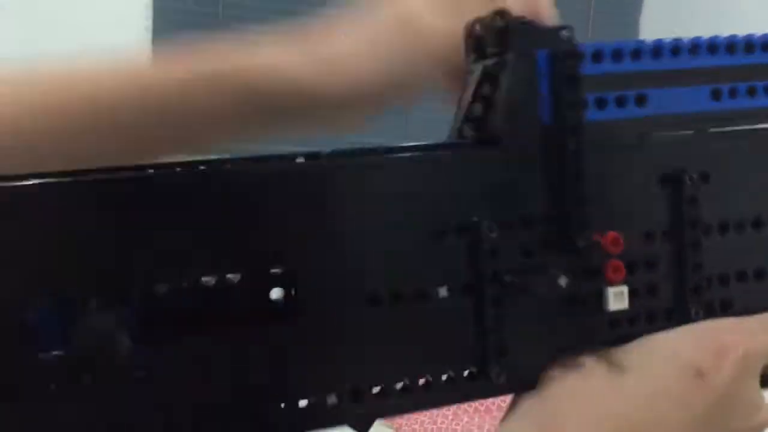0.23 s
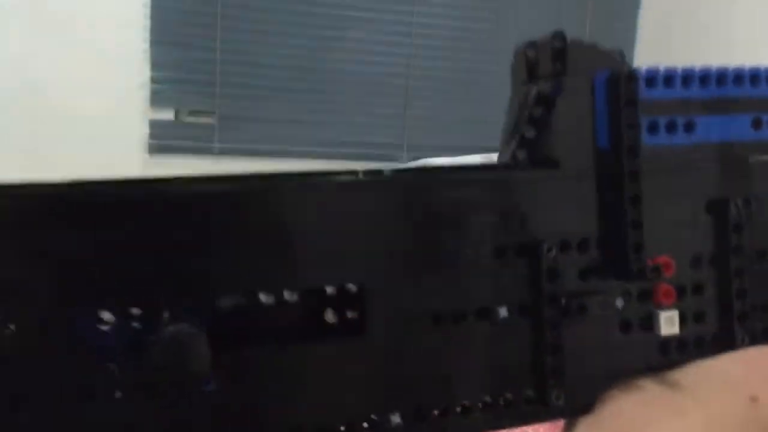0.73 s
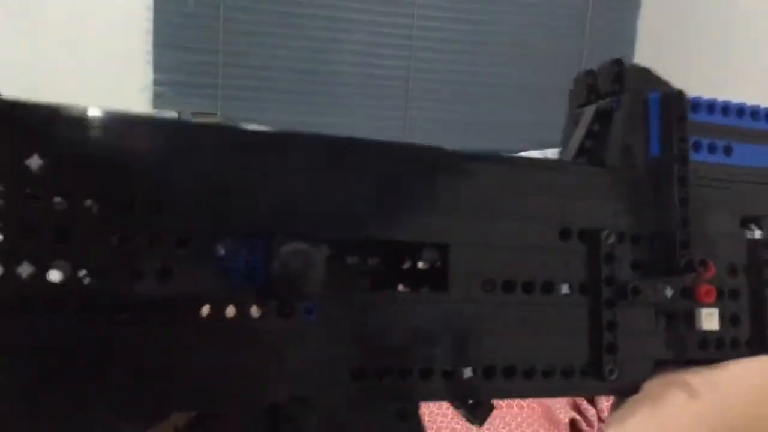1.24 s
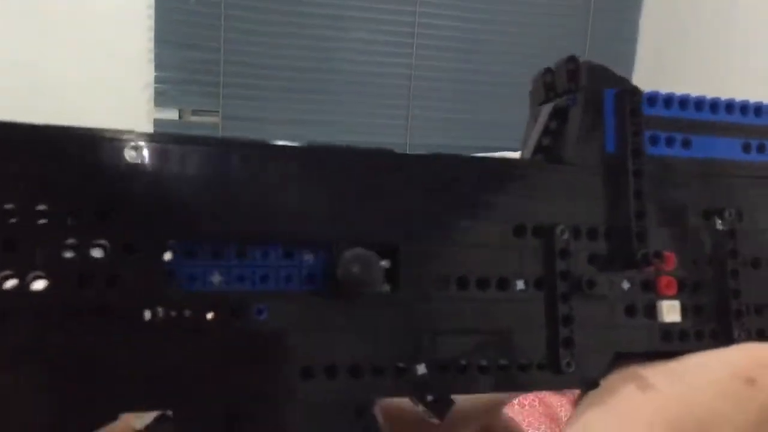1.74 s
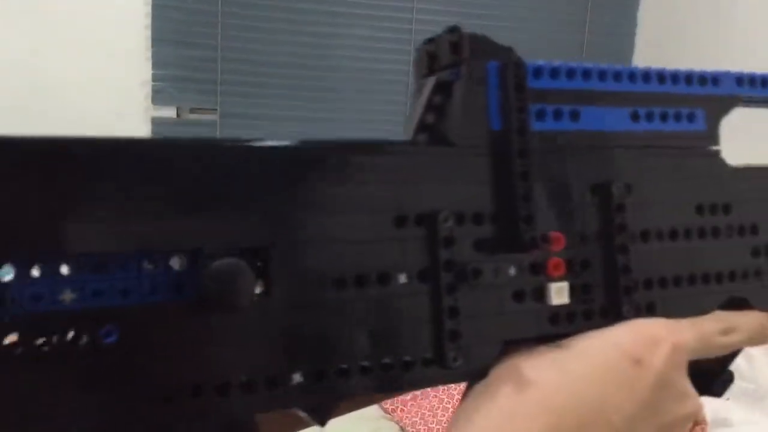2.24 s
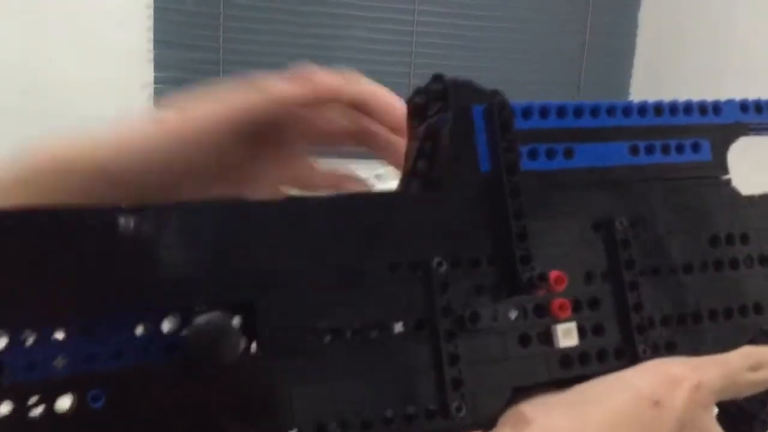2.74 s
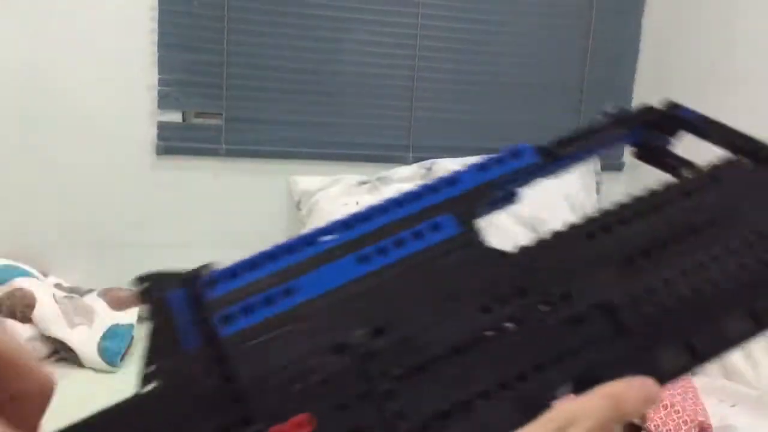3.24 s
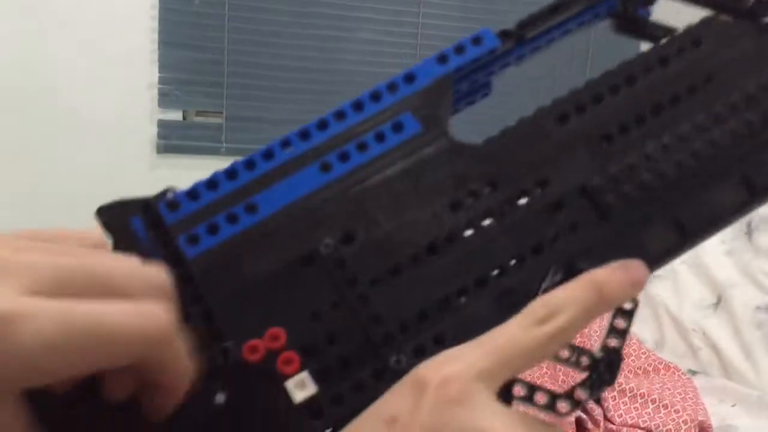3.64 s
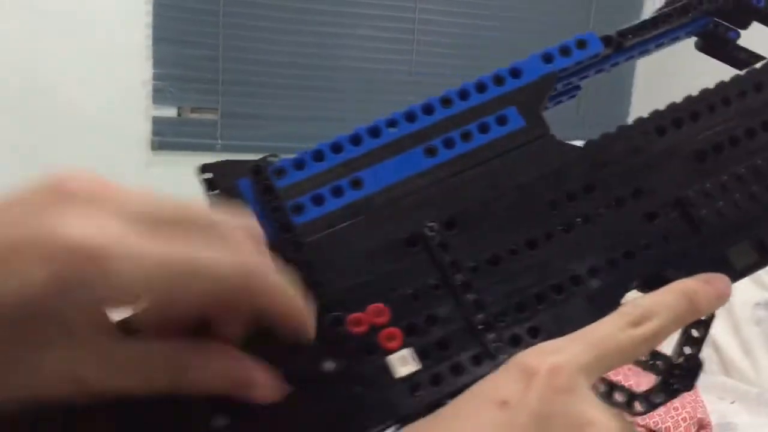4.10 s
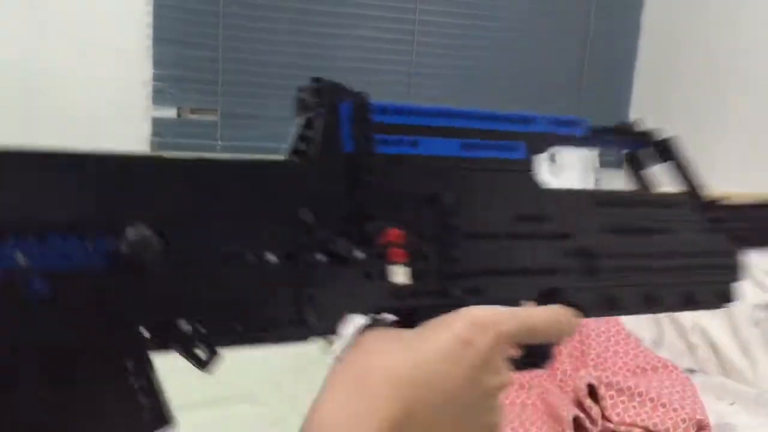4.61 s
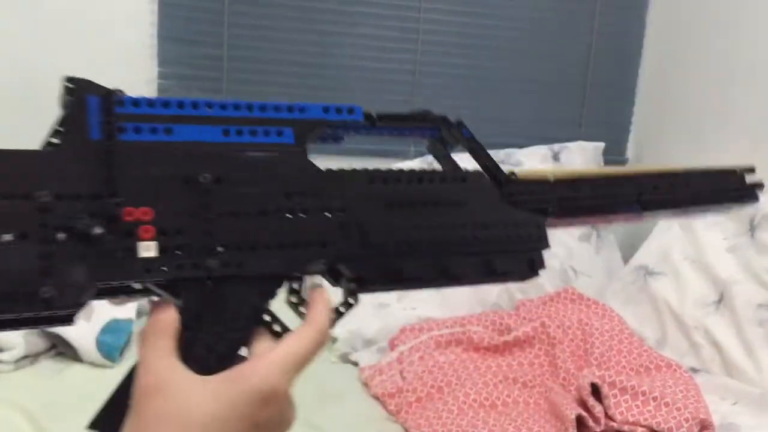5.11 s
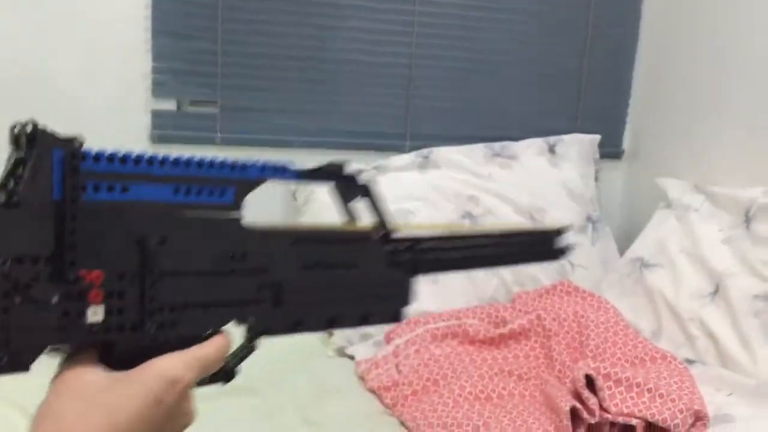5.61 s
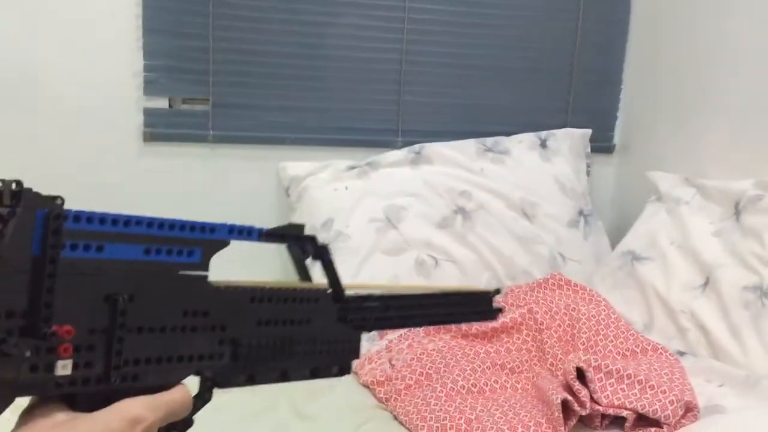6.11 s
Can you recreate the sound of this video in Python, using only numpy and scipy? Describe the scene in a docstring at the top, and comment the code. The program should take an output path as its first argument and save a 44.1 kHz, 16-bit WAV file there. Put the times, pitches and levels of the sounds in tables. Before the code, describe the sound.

Hard plastic clacks of a toy brick rifle being cocked and fired, one overloading the close microphone, over a soft fan hum indoors.

```python
"""A toy rifle of plastic bricks is cocked, fired and handled close to a phone in a small bedroom.
From the start, a fan hums over soft air noise; parts clack as noise bursts ringing the modes of the hollow frame.
Past one second the hardest blows fall: one jolts the microphone into overload and the gain control ducks.
The bolt then chatters along its slide; later come more clacks, a second hard group, and sparse faint clacks.
Throughout, fingers rub and squeak on the bricks as filtered noise, and the room answers with decaying noise."""
import sys
import numpy as np
from scipy import signal
from scipy.fft import rfft, irfft
from scipy.io import wavfile
from scipy.ndimage import uniform_filter1d

SR = 44100
rng = np.random.default_rng(int(sys.argv[2]) if len(sys.argv) > 2 else 0)


def file_out(sig):
    """Save sig as 16-bit WAV at sys.argv[1]."""
    # one column per channel
    cols = np.atleast_2d(sig).T
    # limit, then scale
    lim = np.clip(cols, -1, 1)
    pcm = np.round(lim * 32767).astype(np.int16)
    wavfile.write(sys.argv[1], SR, pcm)


N = 280035

# Plastic parts striking one another.
# Each row: start in seconds, level of the loudest 2 ms in dB, treble snap against body in dB,
# snap pitch in Hz, decay time of the rattle in ms.
PART_STRIKES = [(0.13, -57, -2, 11800, 3.1), (0.515, -38, -9.5, 4500, 7.5), (0.529, -31.5, -5, 11000, 6.3),
                (0.536, -28.5, -22, 4500, 8), (0.733, -44, -16, 4500, 7.4), (0.749, -38.5, -16, 6200, 3.3),
                (0.845, -38.5, -19.5, 4500, 8.1), (0.896, -48, -24, 4500, 7.1),
                (0.923, -49, -7.5, 4400, 3.3), (1.223, -28, -10, 4500, 2.5), (1.229, -33, -11, 6200, 9.3),
                (1.2502, -7, -0.4, 11400, 1.2), (1.2524, -10, 2.1, 11400, 1.5), (1.2597, -8, 7, 14000, 1.4),
                (1.2635, -11, -2.5, 6500, 1.4), (1.5832, -25, -16, 4500, 5.8),
                (2.055, -26.5, -15, 12100, 4.8), (2.285, -40, -14, 4400, 5.4), (2.297, -37, -11, 4500, 4.7),
                (2.324, -27, -8, 5300, 4.4), (2.332, -28, -16, 4900, 4.3), (3.074, -54.5, -7, 9300, 2.5),
                (3.274, -50, -9, 5300, 2.6), (3.288, -33, -4, 8600, 1.5), (3.295, -35, -14, 5600, 2.5),
                (3.523, -52, 1.5, 11200, 5), (3.587, -65, 6, 14000, 2.5), (3.635, -47, -3, 6900, 6),
                (3.687, -50, -5, 12000, 3.6), (3.702, -52, -3, 7100, 2.2), (3.742, -46, -2.1, 8500, 5.2),
                (3.753, -42, -3, 12200, 4.5), (3.772, -49, 0.1, 7700, 3.1), (3.845, -54, -9, 4500, 2.5),
                (3.855, -56, -3, 9000, 2.5), (4.012, -34, -9, 4500, 3), (4.0193, -17.5, -1.5, 11500, 2.7),
                (4.0285, -17, -14, 5500, 1.1), (4.0325, -12.5, 4, 9500, 2.1), (4.036, -15, -13, 4400, 3.6),
                (4.189, -51, 1.1, 10000, 2.8), (4.203, -53, -1.5, 9000, 2.5), (4.266, -60, -1.5, 6000, 2.5),
                (4.353, -55, -4, 6000, 2.3), (4.483, -43.5, -3.5, 6000, 1.9),
                (4.805, -63.5, 6.5, 8100, 2.5), (5.047, -50.5, -13.5, 5800, 2.5)]
# Harder blows favour higher modes: pitch of a 0 dB blow, and its slope.
PITCH_HZ, PITCH_OCTAVES_PER_DB = 2750, .013


def clacks():
    """Impact excitation: each clack is a flurry of tiny contacts that swells fast, dies and rings the frame."""
    length = 4096
    out, t = np.zeros(N + length), np.arange(length) / SR
    blows = PART_STRIKES + bolt_chatter()
    contacts = rng.standard_normal((len(blows), length))
    # Grip and place shift the strength (dB) and tuning of the modes a little.
    strengths_db = rng.normal(0, 2.5, (len(blows), len(FRAME_MODES)))
    detunes = np.exp(rng.normal(0, .05, len(blows)))
    for blow, noise, own_db, detune in zip(blows, contacts, strengths_db, detunes):
        start, db, snap_db, snap_hz, decay_ms = blow
        flurry = np.minimum(t / 0.0014, 1) * np.exp(-t * 1000 / decay_ms)
        uneven = noise * np.sqrt(np.abs(noise))   # a few contacts stand out
        push = uneven * flurry + 1e-18
        pitch_hz = PITCH_HZ * 2 ** (PITCH_OCTAVES_PER_DB * db)
        body, snap = plastic(push, pitch_hz, snap_hz, own_db, detune)
        hit = body / loudest(body) + from_db(snap_db) * snap / loudest(snap)
        out[round(start * SR):][:length] += from_db(db) * hit / loudest(hit)
    return out[:N]


# The bolt's contacts: start and loudest time, peak level, swell and fade in dB per second.
SLIDE_S, SLIDE_LOUDEST_S, SLIDE_DB = 1.5945, 1.634, -16.5
SLIDE_SWELL_DB_PER_S, SLIDE_FADE_DB_PER_S = 142, 600
# First mean gap and the ratio of each gap to the last; then the snap, rattle decay and number of contacts.
SLIDE_GAP_S, SLIDE_GAP_RATIO = .0105, .9
SLIDE_SNAP_DB, SLIDE_MS, SLIDE_CONTACTS = -5, 5, 9
SNAP_LOW_HZ, SNAP_HIGH_HZ = 4430, 10500   # range of the snap pitch


def bolt_chatter():
    """Repeated impact: contacts on the slide tend to come faster, swelling then dying, as rows like the strikes."""
    draws = rng.standard_normal((SLIDE_CONTACTS, 3))
    snap_hz = SNAP_LOW_HZ * (SNAP_HIGH_HZ / SNAP_LOW_HZ) ** rng.random(SLIDE_CONTACTS)
    mean_gaps = SLIDE_GAP_S * SLIDE_GAP_RATIO ** np.arange(SLIDE_CONTACTS)
    gaps = mean_gaps * np.exp(.12 * draws[:, 0])
    start = SLIDE_S + np.cumsum(gaps) - gaps[0]
    swell_db = SLIDE_SWELL_DB_PER_S * (SLIDE_LOUDEST_S - start)
    fade_db = SLIDE_FADE_DB_PER_S * (start - SLIDE_LOUDEST_S)
    db = SLIDE_DB - np.maximum(swell_db, fade_db) + 1.5 * draws[:, 1]
    snap_db = SLIDE_SNAP_DB + 3 * draws[:, 2]
    return list(zip(start, db, snap_db, snap_hz, np.full(SLIDE_CONTACTS, SLIDE_MS)))


# Resonant modes of the hollow brick frame.
# Each row: frequency in Hz, relative strength in dB.
FRAME_MODES = [(340, -14), (500, -9.5), (700, -5.5), (950, -5.5), (1300, 0), (1550, 0), (1880, 2),
               (2240, -1), (2480, -4.5), (2800, 0.5), (3250, -3.5), (3750, -4), (4400, -5), (5200, -23),
               (6200, -12.5)]
BELOW_DB, ABOVE_DB = 7.3, 4.8   # per octave, how modes weaken below and above the pitch of a blow
RING_S = .015   # t60 of a 1 kHz mode, shorter above as plastic damps the treble
BODY_ABOVE_HZ, SNAP_ABOVE_HZ, SNAP_BELOW_HZ = 280, 4750, 4100   # filter corners
SNAP_PEAK_DB, SNAP_PEAK_S = -19, 0.0024   # each contact favours one treble pitch, ringing this long (t60)


def plastic(push, pitch_hz, snap_hz, strengths_db, detune):
    """Modal superposition: a push rings the modes near its pitch most, and gives a dry treble snap."""
    body = 0
    for k, (hz, db) in enumerate(FRAME_MODES):
        octaves = np.log2(hz / pitch_hz)
        far_db = max(ABOVE_DB * octaves, -BELOW_DB * octaves)
        t60 = RING_S * np.sqrt(1000 / hz)
        gain = (-1) ** k * from_db(db + strengths_db[k] - far_db)   # alternating sign
        body = body + gain * ring(push, hz * detune, t60)
    soft = signal.lfilter(*signal.butter(1, SNAP_BELOW_HZ, fs=SR), push)
    snap = soft + from_db(SNAP_PEAK_DB) * ring(push, snap_hz, SNAP_PEAK_S)
    return above(body, BODY_ABOVE_HZ), above(snap, SNAP_ABOVE_HZ)


# Fingers and sliding parts rubbing on the bricks.
# Each row: start in seconds, loudest time in seconds, end in seconds, level of the body in dB,
# treble against body in dB.
RUB_STROKES = [(-0.02, 0.0, 0.084, -52.5, -3), (0.114, 0.212, 0.31, -50, -17),
               (1.046, 1.11, 1.33, -56, -11), (1.17, 1.221, 1.26, -47, -9), (1.38, 1.48, 1.7, -66, -3),
               (1.584, 1.632, 1.665, -25.5, -3.5), (3.28, 3.3, 3.39, -57, -9), (3.49, 3.535, 3.55, -64, -5),
               (3.62, 3.64, 3.665, -57, -7), (3.66, 3.688, 3.73, -56.5, -7), (3.71, 3.755, 3.9, -59, -9),
               (4.44, 4.483, 4.54, -47, -7), (4.635, 4.657, 4.78, -56, -4)]
# How far below its loudest a stroke begins and ends; exponent that rounds its top.
RUB_SWELL_DB, RUB_FADE_DB, RUB_ROUNDING = 22, 26, 1.4


def rubs():
    """Friction as dense fine slips through the frame: each stroke swells to its loudest and fades."""
    t, out = np.arange(N) / SR, np.zeros(N)
    slips = rng.standard_normal(N) * from_db(1.6 * drift(250))
    body, treble = map(rms_one, plastic(slips, 2200, 6000, np.zeros(len(FRAME_MODES)), 0.91))
    for start, top, end, db, bright_db in RUB_STROKES:
        away = np.interp(t, [start, top, end], [1, 0, 1])
        depth_db = np.where(t < top, RUB_SWELL_DB, RUB_FADE_DB)
        touching = (t > start) * (t < end)
        stroke = from_db(db - away ** RUB_ROUNDING * depth_db) * touching
        out += stroke * (body + from_db(bright_db) * treble)
    return out


# Thin squeaks of skin and rubber on the bricks.
# Each row: start in seconds, end in seconds, pitch in Hz, level at the top of the swell in dB.
THIN_SQUEAKS = [(0.155, 0.25, 5400, -70), (.19, .215, 8800, -71), (.97, .98, 4030, -65.5),
                (3.298, 3.37, 7950, -73), (3.526, 3.56, 6500, -70), (3.583, 3.607, 8800, -71),
                (4.656, 4.703, 4300, -72), (4.653, 4.71, 6700, -73)]


def squeaks():
    """Narrow-band resonance: noise through two equal resonators swells and fades."""
    t, out = np.arange(N) / SR, np.zeros(N)
    for start, end, hz, db in THIN_SQUEAKS:
        swell = np.sin(np.pi * np.clip((t - start) / (end - start), 0, 1))
        once = ring(rng.standard_normal(N), hz, 0.0068)
        tone = ring(once, hz, 0.0068)
        out += from_db(db) * swell * rms_one(tone)
    return out * from_db(1.6 * drift(120))   # the grip slips unevenly


# The blow on the microphone: time, swing level before the kick, decay time.
JOLT_S, JOLT_DB, JOLT_DECAY_S = 1.2608, 5.5, .0105
JOLT_RISE_S, JOLT_RISE_HZ = .0005, 700   # the swing builds over a first, faster cycle
JOLT_START_HZ, JOLT_END_HZ, JOLT_FALL_S = 485, 55, .0025   # then it slows at once
JOLT_KICK, JOLT_KICK_S = .6, .002   # the first swings go further still: added share, its decay time


def jolt():
    """Damped oscillation: the diaphragm swings wide, building fast, then quickly slowing and dying."""
    t = np.arange(N) / SR - JOLT_S
    before, after = np.minimum(t, 0), np.maximum(t, 0)
    glide_turns = (JOLT_START_HZ - JOLT_END_HZ) * JOLT_FALL_S * (1 - np.exp(-after / JOLT_FALL_S))
    turns = JOLT_RISE_HZ * before + JOLT_END_HZ * after + glide_turns
    rise = np.exp(before / JOLT_RISE_S)
    decay = np.exp(-after / JOLT_DECAY_S) + JOLT_KICK * np.exp(-after / JOLT_KICK_S)
    size = rise * decay / (1 + JOLT_KICK * (before < 0))   # no kick during the rise
    return -from_db(JOLT_DB) * size * np.sin(2 * np.pi * turns)


# Reverberation of the bedroom.
# Each row: frequency in Hz, time to decay by 60 dB in seconds.
ROOM_DECAY = [(500, 0.23), (1300, 0.29), (3500, 0.32), (9000, 0.3), (15000, 0.13)]


def bedroom(x):
    """Diffuse reverberation: the energy of each band lingers, dies away and sounds as noise."""
    out, white = np.zeros(N), rng.standard_normal((2, N))
    lag = round(0.0027 * SR)   # walls answer after a few milliseconds
    for k, (hz, sos) in enumerate(bands()[6:]):
        r = from_db(-120 / (at_hz(ROOM_DECAY, hz) * SR))   # 60 dB of energy per t60
        energy = signal.lfilter([1 - r], [1, -r], signal.sosfilt(sos, x) ** 2)
        noise = rms_one(signal.sosfilt(sos, white[k % 2]))
        out[lag:] += (np.sqrt(energy) * noise)[:N - lag]
    return out


# Tones of the fan motor.
# Each row: frequency in Hz, mean rms level in dB.
MOTOR_TONES = [(58.5, -70), (88, -61.5), (118, -56.5), (176.5, -53), (236, -59.5), (354, -70.5),
               (872, -65.5), (1455, -71.5), (1513, -74.5)]
# Spectrum of the air noise.
# Each row: frequency in Hz, relative density in dB per Hz.
AIR_SPECTRUM = [(30, -33), (109, -8.5), (239, -6), (290, -14), (364, -12), (415, -20.5), (844, -12.5),
                (1100, -23.5), (1500, -22.5), (2300, -27.5), (2700, -35.5), (4600, -41.5), (7500, -48.5),
                (16000, -53)]
AIR_DB, AIR_PATCHY_DB = -50, 1.5   # mean rms level, spread of each band's own swelling


def fan():
    """Periodic tones over broadband flow noise: the tones waver and the air's bands swell on their own."""
    t = np.arange(N) / SR
    tones = np.zeros(N)
    for hz, db in MOTOR_TONES:
        size = np.sqrt(2) * from_db(db + 2.5 * drift(3))
        tones += size * np.sin(2 * np.pi * hz * t + .7 * drift(3))
    white, air = rng.standard_normal((2, N)), np.zeros(N)
    for k, (_, sos) in enumerate(bands()):
        air += signal.sosfilt(sos, white[k % 2]) * from_db(AIR_PATCHY_DB * drift(13))
    air_gain = from_db(AIR_DB + 0.25 * drift(4.1))
    return tones + air_gain * rms_one(colour(air, AIR_SPECTRUM))


def from_db(db):
    """Logarithmic level: decibels to amplitude gain."""
    return 10 ** (np.asarray(db) / 20)


def rms_one(x):
    """Effective value: scale to rms 1."""
    return x / np.sqrt(np.mean(x ** 2) + 1e-20)


def loudest(x):
    """Short-time level: rms of the loudest two milliseconds."""
    return np.sqrt(uniform_filter1d(x ** 2, size=88).max())


def at_hz(points, hz):
    """Logarithmic pitch: read a table of (Hz, value) on a log-frequency axis."""
    points = np.array(points)
    return np.interp(np.log(np.maximum(hz, 1)), np.log(points[:, 0]), points[:, 1])


def colour(x, spectrum):
    """Spectral shaping: weight each frequency by a table in dB."""
    hz = np.arange(len(x) // 2 + 1) * SR / len(x)
    return irfft(rfft(x) * from_db(at_hz(spectrum, hz)), len(x))


def drift(rate):
    """Low-passed random fluctuation of rms 1, with its corner near rate in Hz."""
    r = np.exp(-2 * np.pi * rate / SR)
    noise = rng.standard_normal(N + SR)   # the first second lets the filter settle
    return rms_one(signal.lfilter([1], [1, -2 * r, r * r], noise)[SR:])


def ring(x, hz, t60):
    """Damped resonance: a two-pole mode that decays by 60 dB in t60 seconds."""
    r, w = from_db(-60 / (t60 * SR)), 2 * np.pi * hz / SR
    return signal.lfilter([0, np.sin(w)], [1, -2 * r * np.cos(w), r * r], x)


def above(x, hz):
    """High-pass filtering."""
    return signal.sosfilt(signal.butter(3, hz, "high", fs=SR, output="sos"), x)


def bands():
    """Fractional-octave analysis: half-octave band-passes with their centres in Hz."""
    edges = 30 * 2 ** np.arange(0, 9.6, .5)
    pairs = []
    for low, high in zip(edges, edges[1:]):
        sos = signal.butter(2, [low, high], "band", fs=SR, output="sos")
        pairs.append((np.sqrt(low * high), sos))
    return pairs


ROOM_DB = -12.5   # gain of the reflections


def scene():
    """Superposition of the rifle, its reflections, the jolt and the fan."""
    rifle = clacks() + rubs() + squeaks()
    reflections = from_db(ROOM_DB) * bedroom(rifle)
    return (rifle + reflections + jolt() + fan())[None]


PORT_HZ, PORT_WIDTH_HZ, PORT_DB = 12400, 2300, -14   # resonance of the microphone port
OVERLOAD = .69   # amplitude at which peaks flatten
# Ducking threshold, share of the excess taken off, recovery in dB per second, smoothing time.
DUCK_ABOVE_DB, DUCK_SHARE, RECOVER_DB_S, DUCK_S = -21.5, 0.59, 31, 0.051
HISS_DB, CUTOFF_HZ = -83.5, 16200   # circuit hiss before the final low-pass; its stop-band edge


def record(dry):
    """Resonance, saturation, compression: port lifts treble, peaks flatten, gain ducks and creeps back."""
    r = np.exp(-np.pi * PORT_WIDTH_HZ / SR)
    poles = [1, -2 * r * np.cos(2 * np.pi * PORT_HZ / SR), r * r]
    port = signal.lfilter([(1 - r * r) / 2, 0, (r * r - 1) / 2], poles, dry)
    x = dry + from_db(PORT_DB) * port
    x = x / (1 + np.abs(x / OVERLOAD) ** 6) ** (1 / 6)
    level_db = 10 * np.log10(signal.lfilter([.002], [1, -.998], x ** 2) + 1e-12)
    # A running maximum against a rising ramp holds each peak and lets it fall at a steady rate.
    ramp = RECOVER_DB_S * np.arange(N) / SR
    held_db = np.maximum.accumulate(level_db + ramp, axis=1) - ramp
    over_db = np.maximum(held_db - DUCK_ABOVE_DB, 0)
    r = np.exp(-1 / (DUCK_S * SR))
    slow_db = signal.lfilter([(1 - r) ** 2], [1, -2 * r, r * r], over_db)   # the duck sets in late and gently
    ducked = x * from_db(-DUCK_SHARE * slow_db)
    x = ducked + from_db(HISS_DB) * rng.standard_normal(N)   # circuit hiss is not ducked
    return signal.sosfilt(signal.cheby2(14, 60, CUTOFF_HZ, fs=SR, output="sos"), x)


dry = scene()
out = record(dry)
file_out(out)
```